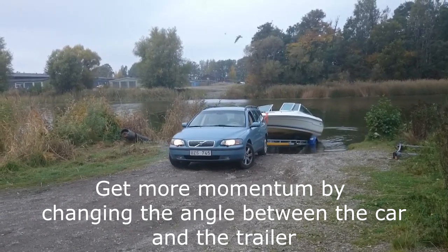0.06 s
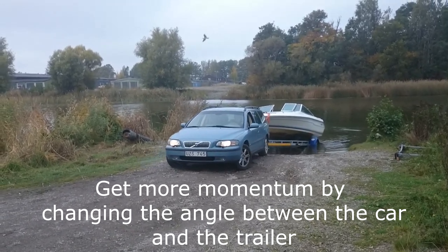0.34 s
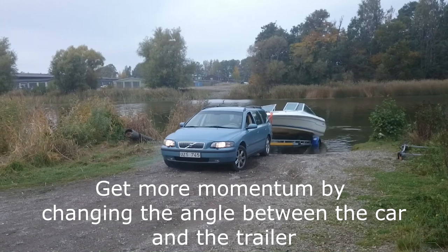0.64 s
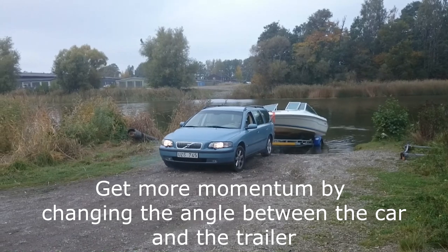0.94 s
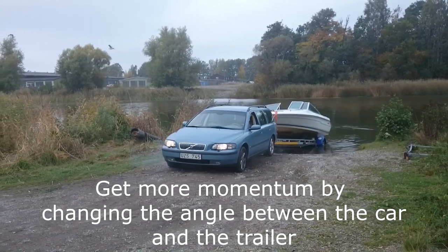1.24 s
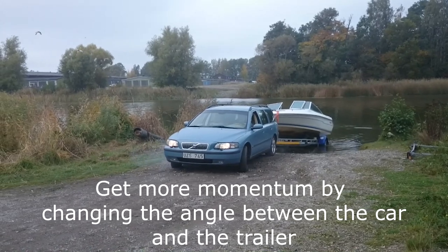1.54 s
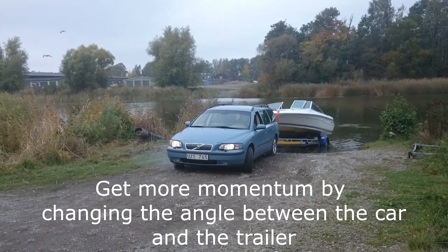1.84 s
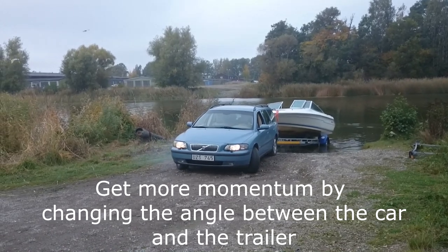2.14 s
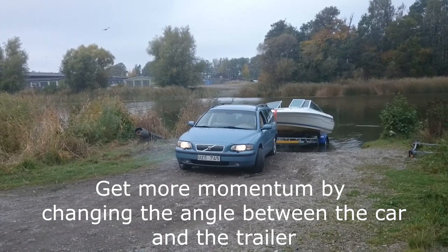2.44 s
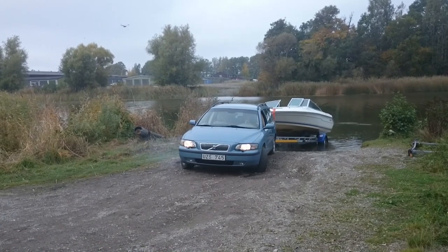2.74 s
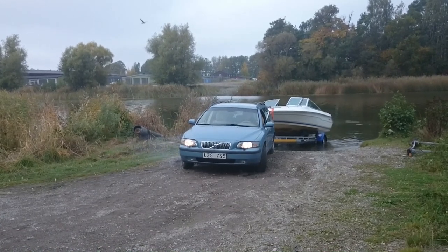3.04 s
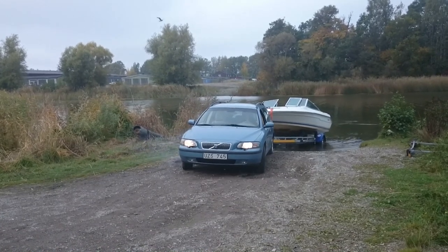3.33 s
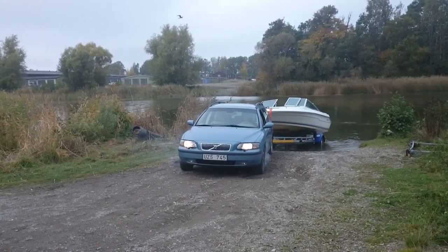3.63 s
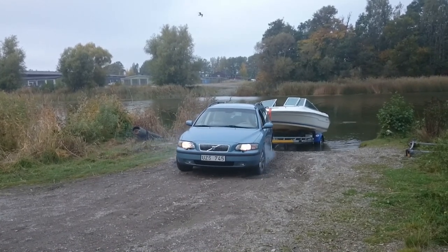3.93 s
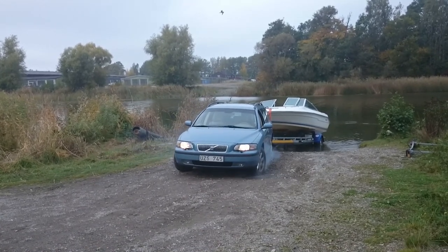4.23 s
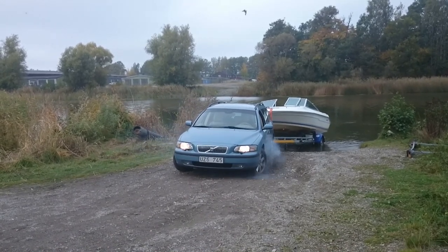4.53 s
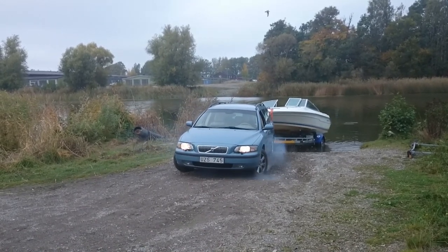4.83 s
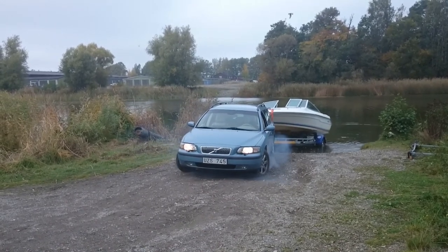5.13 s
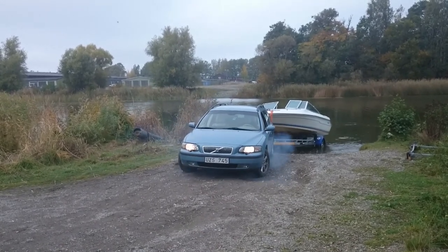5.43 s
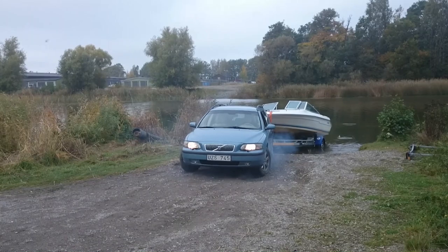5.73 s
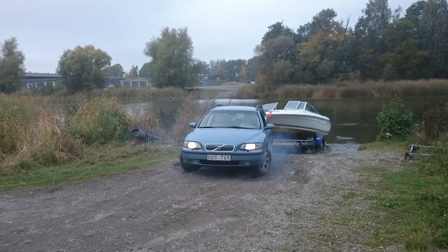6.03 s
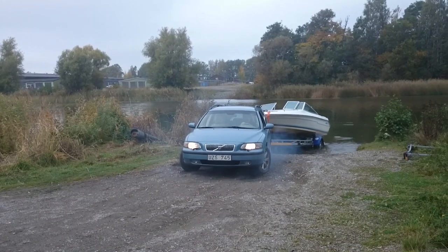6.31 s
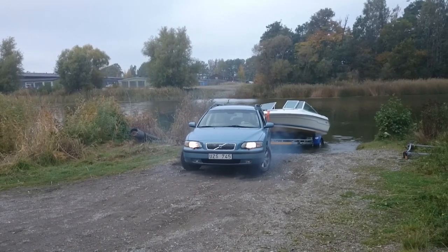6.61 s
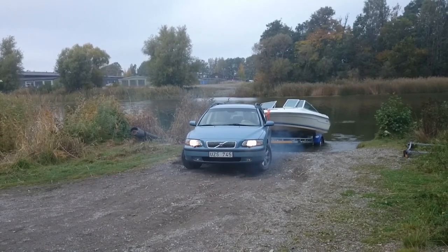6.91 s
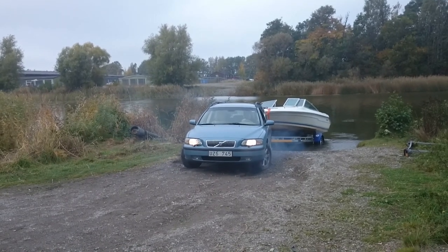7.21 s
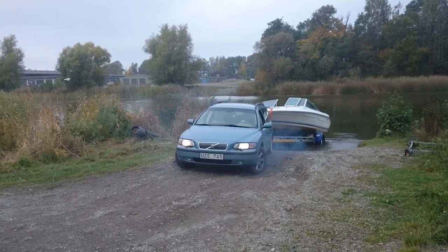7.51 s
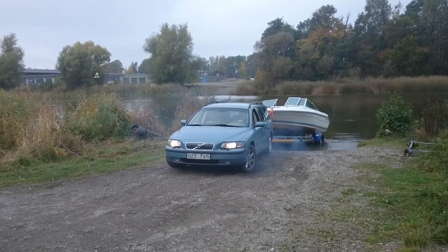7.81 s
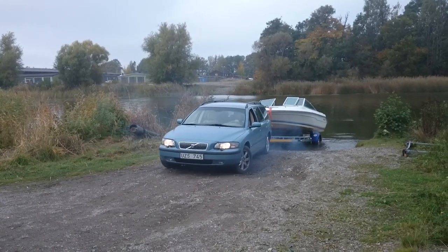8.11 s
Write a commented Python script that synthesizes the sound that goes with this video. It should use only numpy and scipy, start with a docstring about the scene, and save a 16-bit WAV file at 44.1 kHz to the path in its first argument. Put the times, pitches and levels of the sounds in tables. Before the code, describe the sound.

Outdoors, about ten metres away, a car struggles to pull a trailer up a gravel slope. Its spinning tyres crunch, scuff and squeal, throwing stones and grit over a low engine drone. A quieter stretch follows, with the engine slowing, a few pebble clicks and faint wind rumble. Then the engine revs up, a wheel shudders briefly and the gravel grinds and sprays again.

```python
"""A five-cylinder estate car drags a boat trailer up a gravel ramp, about ten metres off, in a light breeze.
0-5 s: the front tyres spin and squeal; stones grind under the tread, thump the carcass and spray away.
5-6.5 s: the driver lifts off, the engine runs down, a few last pebbles land.
From 6.5 s: the revs rise; near 7.4 s the tyres break loose again and a wheel briefly shudders."""
import sys
import numpy as np
from scipy import signal
from scipy.fft import rfft, irfft, next_fast_len
from scipy.io import wavfile
from scipy.ndimage import uniform_filter1d

SR = 44100
rng = np.random.default_rng(int(sys.argv[2]) if len(sys.argv) > 2 else 0)


def file_out(sig):
    """Save sig as 16-bit WAV at sys.argv[1]."""
    # one column per channel
    cols = np.atleast_2d(sig).T
    # limit, then scale
    lim = np.clip(cols, -1, 1)
    pcm = np.round(lim * 32767).astype(np.int16)
    wavfile.write(sys.argv[1], SR, pcm)


N = 368676
TIME = np.arange(N) / SR

# wheelspin: t/s, grinding/dB, spray/dB
WHEELSPIN = [(0.0, -22, -26.5), (0.09, -24, -27.5), (1.49, -21.5, -24), (2.12, -25.5, -26),
             (2.7, -20.5, -22.5), (3.15, -27.5, -27.5), (3.86, -22.5, -23.5), (4.26, -28, -30),
             (4.4, -22.5, -21), (4.54, -20, -24.5), (4.7, -23, -27), (4.82, -20.5, -21.5),
             (5.01, -27.5, -32.5), (5.14, -48, -40), (6.01, -49.5, -49.5), (6.19, -58.5, -57),
             (7.29, -42, -38), (7.43, -26, -29.5), (7.71, -28, -30), (7.89, -33.5, -35.5),
             (8.08, -22.5, -26), (8.36, -25.5, -37)]


def undb(db):
    return 10 ** (np.asarray(db) / 20)


def unit(x):
    return x / np.sqrt(np.mean(x ** 2))


def curves(table):
    """Columns of a time table, per sample."""
    t_s, *columns = np.transpose(table)
    return [np.interp(TIME, t_s, column) for column in columns]


def along(table, hz):
    """Spectrum read on a log-frequency axis."""
    f_hz, value = np.transpose(table)
    return np.interp(np.log(hz + 1), np.log(f_hz), value)


def colour(x, spectrum, size=4096):
    """Minimum-phase filter from rows of f/Hz, gain/dB; rolls off beyond the ends."""
    hz = np.fft.rfftfreq(size, 1 / SR) + 1
    outside = np.abs(np.log(hz / np.clip(hz, spectrum[0][0], spectrum[-1][0])))
    cepstrum = irfft(np.log(undb(along(spectrum, hz))) - 4.33 * outside)
    cepstrum[1:size // 2] *= 2
    cepstrum[size // 2 + 1:] = 0
    return signal.fftconvolve(x, irfft(np.exp(rfft(cepstrum))))[:len(x)]


def ring(x, hz, width_hz):
    """One resonance, gain 1 at centre."""
    return signal.lfilter(*signal.iirpeak(hz, hz / width_hz, fs=SR), x)


def body(force, response):
    """Drive a resonant body at unit broadband gain."""
    return response(force) / np.linalg.norm(response(signal.unit_impulse(N)))


def walk(rate_hz):
    """Smooth random wander, RMS 1."""
    hold = int(SR / rate_hz)
    steps = np.repeat(rng.standard_normal(N // hold + 2), hold)
    return unit(uniform_filter1d(steps, hold)[rng.integers(hold):][:N])


def burst(start_s, rise_s, decay_s):
    """Envelope of one blow."""
    out = np.zeros(N)
    first = int(start_s * SR)
    age_s = TIME[:min(int(10 * decay_s * SR), N - first)]
    out[first:first + len(age_s)] = (1 - np.exp(-age_s / rise_s)) * np.exp(-age_s / decay_s)
    return out


def swell(start_s, length_s):
    """Half-sine envelope."""
    return np.sin(np.pi * np.clip((TIME - start_s) / length_s, 0, 1))


def grains(per_s, spread_db):
    """Random stone contacts: many small, few large."""
    hit = rng.random(N) < per_s / SR
    size = undb(spread_db * np.minimum(rng.exponential(size=N), 5))
    return unit(hit * size * rng.choice([-1, 1], N))


def follow(level_db, law):
    """Gain from a level plus a law's offsets: base/dB, loose grit/dB, hot rubber/dB, rolling/dB."""
    dig_in_s, dig_takes_s = 0.49, 0.082  # tyres skim loose grit, then dig into packed stones
    heat_s = 1.85  # rubber warms with spin, cools as slowly
    grip_below_db, grip_range_db = -29, 3  # less grinding: tyres grip and roll
    grind_db, _ = curves(WHEELSPIN)
    loose = np.clip(.5 - (TIME - dig_in_s) / dig_takes_s, 0, 1)
    heat = signal.lfilter([1], [1, -np.exp(-1 / (heat_s * SR))], undb(grind_db) ** 2)
    rolling = np.clip(.5 - (grind_db - grip_below_db) / grip_range_db, 0, 1)
    base_db, loose_db, hot_db, rolling_db = law
    return undb(level_db + base_db + loose_db * loose + hot_db * heat / heat.max() + rolling_db * rolling)


def chirps(centre_hz, spread, rise_cycles, count):
    """Tread blocks snap off stones: short chirps of random pitch, glide and size."""
    out = np.zeros(N)
    starts = ((np.arange(count) + rng.random(count)) * N / count).astype(int)
    for start, (pitch, glide, size) in zip(starts, rng.uniform(-1, 1, (count, 3))):
        cycles = (TIME[start:start + SR // 20] - TIME[start]) * centre_hz * np.exp(spread * pitch)
        age = cycles / rise_cycles
        envelope = undb(5 * size) * age * np.exp(-age ** 2 / 2)
        out[start:start + len(age)] += envelope * np.sin(2 * np.pi * cycles * (1 + .03 * glide * age))
    return unit(out)


def tread(force):
    """The horn between tread and ground radiates a broad hump."""
    # horn response: f/Hz, gain/dB
    horn = [(400, -12), (510, -13), (670, -2.5), (850, -0.5), (1020, -1.5), (1200, -5), (1450, -14.5)]
    return colour(force, horn)


def carcass(force):
    """The hollow tyre booms in its low modes."""
    # belt, air cavity and sidewall modes: f/Hz, width/Hz, gain/dB
    modes = [(95.8, 7.1, 1), (145, 92, 0.5), (231.8, 16, 10), (295, 78, 7)]
    boom = sum(undb(db) * ring(force, hz, width_hz) for hz, width_hz, db in modes)
    return colour(boom, [(40, -13.0), (85, 2.0), (350, -2.5), (470, -7.5)])


def tyres(grind_db, judder_db):
    """Stones grind under the tread and pound the carcass; rubber scuffs and scrubs over them."""
    # tread bites on larger stones: t/s, decay/s, crunch/dB, thump/dB
    bites = [(0.569, 0.066, -18, -17), (0.794, 0.077, -14.5, -16.5), (1.098, 0.033, -22, -14.5),
             (1.636, 0.055, -14.5, -13.5), (1.834, 0.018, -12.5, -16.5), (2.084, 0.092, -24.5, -16.5),
             (2.339, 0.08, -17, -15.5), (2.48, 0.016, -14, -12.5), (2.6, 0.025, -12, -16.5),
             (2.916, 0.018, -13, -14.5), (3.313, 0.022, -34, -15), (3.813, 0.017, -9, -35),
             (3.856, 0.018, -19.5, -11), (4.139, 0.02, -14, -28), (4.334, 0.024, -19, -19),
             (4.46, 0.056, -15, -19), (4.604, 0.018, -11, -19), (4.884, 0.011, -16, -13),
             (7.34, 0.044, -25, -28), (7.95, 0.04, -23.5, -42)]
    # hot rubber on bare stone: t/s, length/s, level/dB
    scrapes = [(3.452, 0.13, -25), (3.752, 0.13, -28), (4.03, 0.063, -23), (7.94, 0.34, -29)]
    # offsets from grinding: base/dB, loose/dB, hot/dB, rolling/dB
    grind_law = (-2.5, 0.5, 2.17, -0.9)
    pound_law = (-7, -6, -0.5, 2.5)
    scuff_law = (-6.5, -2.5, -2.5, -1)
    scrub_law = (-15, 0.5, 10.5, 0)
    crunch, thump = np.zeros(N), np.zeros(N)
    for t_s, decay_s, crunch_db, thump_db in bites:
        blow = burst(t_s, 0.3 * decay_s, decay_s)
        crunch += undb(crunch_db) * blow
        thump += undb(thump_db) * blow
    crush = rng.standard_normal(N)
    grinding = grains(per_s=2600, spread_db=1.5) * follow(grind_db, grind_law) * undb(judder_db + walk(90))
    pounding = grains(per_s=700, spread_db=1.0) * follow(grind_db, pound_law) * undb(1.9 * judder_db)
    scrub = unit(colour(grains(per_s=2800, spread_db=4.0), [(1300, -8), (1830, 2.5), (2100, -12.5)]))
    scrape_gain = sum(undb(db) * swell(t_s, length_s) for t_s, length_s, db in scrapes)
    scrub *= np.hypot(follow(grind_db, scrub_law) * undb(2 * judder_db), scrape_gain)
    scuff = chirps(861, spread=0.292, rise_cycles=4.4, count=400) * follow(grind_db, scuff_law)
    stones = body(grinding + crunch * crush, tread) + body(pounding + thump * crush, carcass)
    return stones + scuff + scrub


def squeal(fade_s=0.06):
    """Rubber sticks and slips on stone: fluttering runs of chirps, each around one pitch."""
    # slips: t/s, length/s, f/Hz, level/dB, relative pitch spread
    slips = [(-0.1, 0.46, 610, -27.5, .04), (-0.05, 0.38, 775, -24, .04), (0.28, 1.2, 850, -25, .06),
             (2.28, 0.85, 745, -25.5, .03), (2.72, 0.85, 1080, -27.5, .06)]
    out = np.zeros(N)
    for t_s, length_s, hz, db, spread in slips:
        held = np.clip(np.minimum(TIME - t_s, t_s + length_s - TIME) / fade_s, 0, 1)
        out += undb(db) * held * chirps(hz, spread, rise_cycles=7, count=360)
    return out


def gravel(grind_db, spray_db, judder_db):
    """Fine spray, coarse stones and grit leave the tread in handfuls; stronger spray, more stones."""
    # whole loads flung: t/s, length/s, spray/dB, coarse/dB, grit/dB
    throws = [(1.03, 0.25, -25, -29, -47), (1.33, 0.23, -23, -20.5, -23), (2.51, 0.49, -23.5, -49, -48),
              (4.31, 0.44, -27, -45, -27), (5.968, 0.092, -62, -57, -45.5), (6.747, 0.57, -48, -44, -64),
              (7.307, 0.51, -32.5, -31, -41.5), (7.896, 0.64, -26.5, -26, -30.5)]
    # spectra by stone size: f/Hz, level/dB
    spray_spectrum = [(3000, -15), (3350, -4.5), (3730, -12), (4000, -3), (4900, -1), (5850, 2.5),
                      (6500, -3.5), (7500, -10.5), (9000, -24)]
    coarse_spectrum = [(3700, -6), (4100, 0), (5200, 0.5), (6200, -17.5)]
    grit_spectrum = [(1400, -7), (2200, -4.5), (2550, -1), (2980, -9.5), (3350, -4.5), (3750, -10)]
    # offsets from spray and from grinding: base/dB, loose/dB, hot/dB, rolling/dB
    spray_law = (-0.82, -2.3, 1, -0.023)
    grit_law = (-6, 5, -3, 5.5)
    spray_gain, coarse_gain, grit_gain = follow(spray_db, spray_law), 0, follow(grind_db, grit_law)
    for t_s, length_s, load_spray_db, load_coarse_db, load_grit_db in throws:
        load = swell(t_s, length_s)
        spray_gain = np.hypot(spray_gain, undb(load_spray_db) * load)
        coarse_gain = np.hypot(coarse_gain, undb(load_coarse_db) * load)
        grit_gain = np.hypot(grit_gain, undb(load_grit_db) * load)
    per_s = 9000 * (spray_gain / spray_gain.max()) ** .2
    handfuls = undb(.7 * judder_db + 1.1 * walk(90)) / np.sqrt(per_s / per_s.mean())
    sizes = (spray_spectrum, spray_gain), (coarse_spectrum, coarse_gain), (grit_spectrum, grit_gain)
    stones = sum(unit(colour(grains(per_s, spread_db=2.5), spectrum)) * gain for spectrum, gain in sizes)
    return handfuls * stones


def sand(spray_db, judder_db):
    """A wide cloud of sand hisses, independent left and right."""
    # hiss: f/Hz, level/dB
    spectrum = [(7500, -3.5), (10000, 2), (12100, -15.5), (13200, -7.5), (15500, -9.5)]
    # offsets from spray: base/dB, loose/dB, hot/dB, rolling/dB
    sand_law = (-13.5, -8, -1, -2.5)
    cloud = np.array([unit(colour(grains(per_s=9000, spread_db=3.5), spectrum)) for _ in range(2)])
    return cloud * follow(spray_db, sand_law) * undb(judder_db)


def engine():
    """Five unequal cylinders fire into the exhaust; gas rushes once per firing."""
    # revs: t/s, firing rate/Hz, level/dB
    revs = [(0, 96.9, -42), (3.9, 88, -44.5), (5.0, 123.3, -42), (5.55, 97.7, -51.5), (6.1, 62.36, -50),
            (6.55, 68, -50.5), (6.8, 84.2, -42), (7.1, 98.1, -39.5), (7.85, 79.05, -44.5),
            (8.36, 115.8, -30.5)]
    # pulse per cylinder: level/dB
    cylinders_db = (4, -3, 2, -5, -1)
    # exhaust response: f/Hz, gain/dB
    exhaust = [(25, -30), (70, 6), (175, -2.5), (300, 1.5), (480, -12.5), (800, -26), (2000, -36)]
    firing_hz, db = curves(revs)
    phase = np.cumsum(firing_hz * (1 + .025 * walk(40))) / SR
    fires = np.flatnonzero(np.diff(np.floor(phase)))
    pulses = np.zeros(N)
    pulses[fires] = undb(np.resize(cylinders_db, len(fires)) + 2.1 * rng.standard_normal(len(fires)))
    gas = rng.standard_normal(N) * np.exp(-(phase % 1) / 0.34)
    flow = unit(pulses - pulses.mean()) + unit(gas)
    return unit(colour(flow, exhaust)) * undb(db)


def breeze():
    """Soft gusts rumble, mostly at the right microphone."""
    gusts_db = 1.5 * walk(4)
    rumble = unit(colour(rng.standard_normal(N), [(20, -14), (65, -22), (120, -25.0)]))
    return rumble * undb(-48 + gusts_db) * np.array([[.4], [1.4]])


def knocks():
    """Stones shot from under the tread knock hollowly, with a rasp of contact."""
    # single stones: t/s, level/dB, f/Hz
    shots = [(0.141, -9.5, 800), (0.663, -10.5, 900), (0.931, -8, 710), (1.429, -4, 953), (2.621, -4, 723),
             (2.932, -10, 730), (4.402, -7, 670), (4.611, -3.5, 704), (4.763, -7.5, 950), (6.642, -33, 800),
             (7.488, -9.5, 731), (7.627, -11.5, 820), (8.233, -7, 894)]
    rasp = 0.39 * unit(tread(rng.standard_normal(N)))
    out = np.zeros(N)
    for t_s, db, hz in shots:
        tone = np.sin(2 * np.pi * hz * (TIME - t_s))
        out += undb(db) * burst(t_s, rise_s=.0015, decay_s=.0075) * (tone + rasp)
    return out


def pebbles():
    """Each pebble cracks, rings briefly and rattles on in small bounces."""
    # strikes on car or stones: t/s, level/dB, f/Hz, crack re level/dB
    strikes = [(1.146, -27, 5360, -11.5), (1.637, -17.5, 5200, -23), (1.903, -23, 6050, -12),
               (2.181, -18, 4540, -14), (4.143, -20, 5700, -16), (5.310, -35.5, 5980, -5),
               (5.564, -31.5, 5740, -8), (6.436, -44, 5470, -18), (8.266, -29, 5300, -20)]
    rings, cracks = np.zeros(N), np.zeros(N)
    bounces = unit(undb(5 * walk(160)))
    for t_s, db, hz, crack_db in strikes:
        rattle = .17 * bounces * burst(t_s, rise_s=.006, decay_s=.028)
        contact = rng.standard_normal(N) * (burst(t_s, rise_s=.0007, decay_s=.005) + rattle)
        rings += undb(db) * (2.6 * ring(contact, hz, width_hz=800) + .7 * contact)
        cracks += undb(db + crack_db) * contact
    rings = colour(rings, [(1000, 1), (5500, 13.5), (7500, 6.5)])
    return rings + colour(cracks, [(6000, -17), (10000, 13), (15000, -9)])


def shudder():
    """The driven wheel hops as it briefly grips; its belt booms."""
    belt_hz = 86 * (1 + 0.037 * walk(25))
    belt = np.sin(2 * np.pi * np.cumsum(belt_hz) / SR)
    rattle = unit(ring(ring(rng.standard_normal(N), 125, width_hz=147), 82, width_hz=130))
    return undb(-23.0) * swell(start_s=7.45, length_s=0.31) * (belt + 0.73 * rattle)


def outdoors(x, scatter_s=0.0093, size=16384):
    """Ground and bank scatter the sound differently to the two microphones."""
    # left-right likeness: f/Hz, likeness/0-1
    likeness = [(500, 0.88), (2000, 0.86), (5000, 0.74), (8000, 0.069)]
    # left minus right: f/Hz, level/dB
    balance = [(40, -6.5), (130, -4.3), (380, -5), (700, -3), (1100, -0.5), (2400, -1), (5700, -5),
               (8000, 2.8)]
    # phase lead of the left: f/Hz, lead/rad
    lead = [(400, 0.021), (1100, 1), (2200, -0.43), (5600, 0.045), (8000, 0.54)]
    dip_hz, dip_width_hz, dip_db = 488, 42, -5.5  # soft-ground reflection cancels a band
    length = next_fast_len(N + size)
    hz = np.fft.rfftfreq(length, 1 / SR)
    echoes = rng.standard_normal(size) * np.exp(-np.arange(size) / SR / scatter_s)
    scatter = rfft(echoes / np.linalg.norm(echoes), length)
    alike = np.clip(along(likeness, hz), 0, 1)
    side = np.array([[1], [-1]])
    pair = np.sqrt((1 + alike) / 2) + side * np.sqrt((1 - alike) / 2) * scatter
    direction = undb(side * along(balance, hz) / 2) * np.exp(1j * side * along(lead, hz) / 2)
    ground = undb(dip_db * np.exp(-((hz - dip_hz) / dip_width_hz) ** 2))
    return irfft(rfft(x, length) * ground * pair * direction, length)[:, :N]


def scene():
    """The car on the ramp, heard across open ground."""
    grind_db, spray_db = curves(WHEELSPIN)
    judder_db = 1.1 * walk(45)  # wheel hop: tyre, gravel and sand swell together
    wheels = tyres(grind_db, judder_db) + knocks() + squeal() + shudder()
    stones = gravel(grind_db, spray_db, judder_db) + pebbles()
    return outdoors(wheels + stones + engine()) + sand(spray_db, judder_db) + breeze()


def record(dry):
    """Soft clip, then steep low-pass."""
    top_hz = 15900
    lowpass = signal.ellip(10, .1, 80, top_hz, fs=SR, output="sos")
    return signal.sosfilt(lowpass, np.tanh(0.69 * dry) / 0.7)


dry = scene()
out = record(dry)
file_out(out)
```